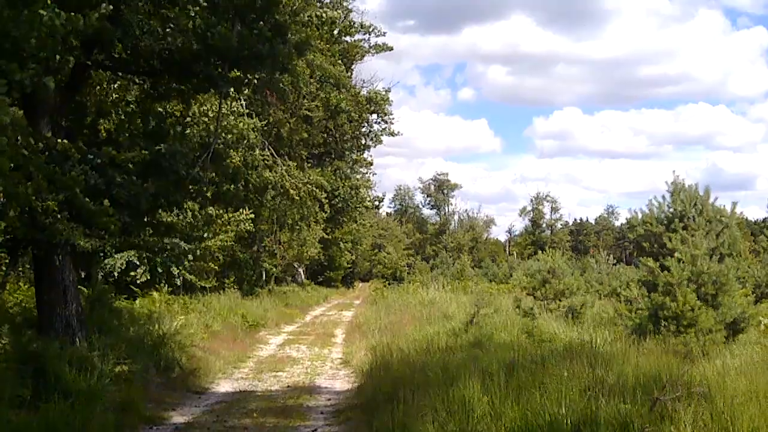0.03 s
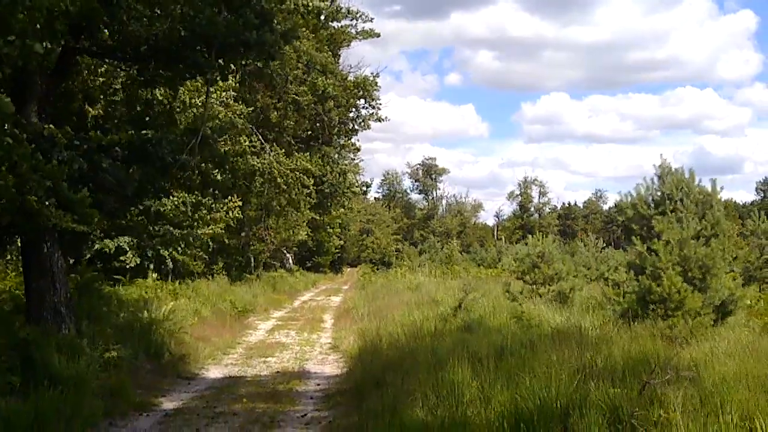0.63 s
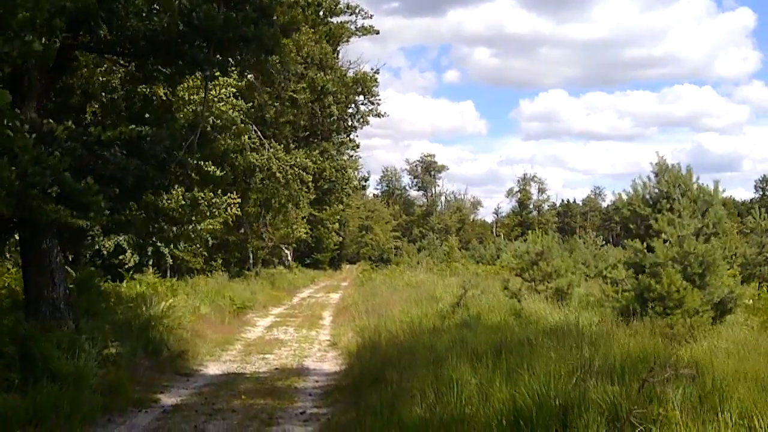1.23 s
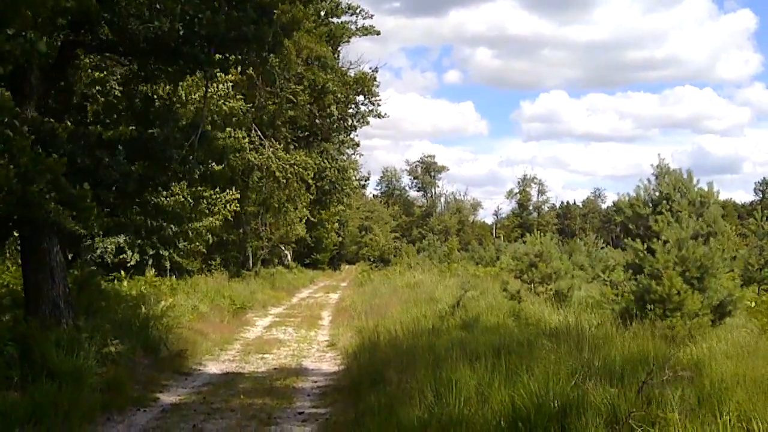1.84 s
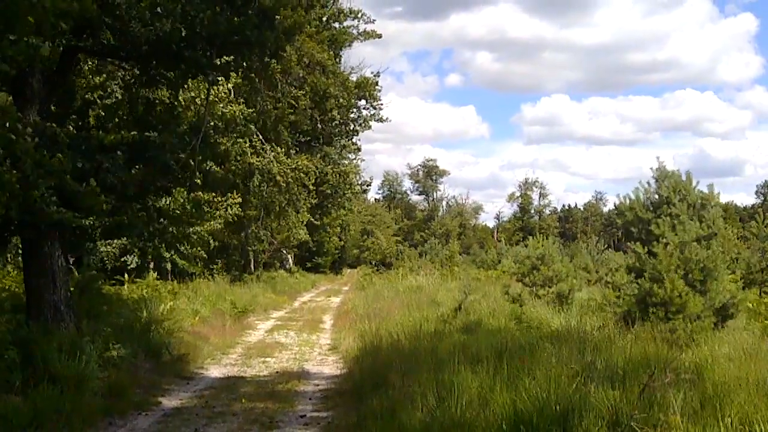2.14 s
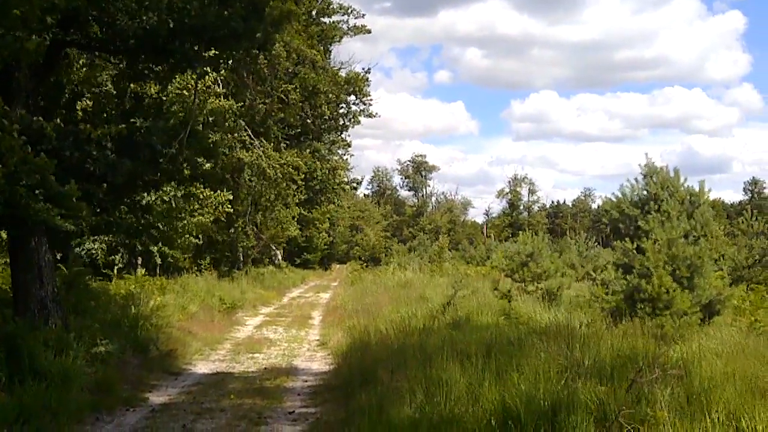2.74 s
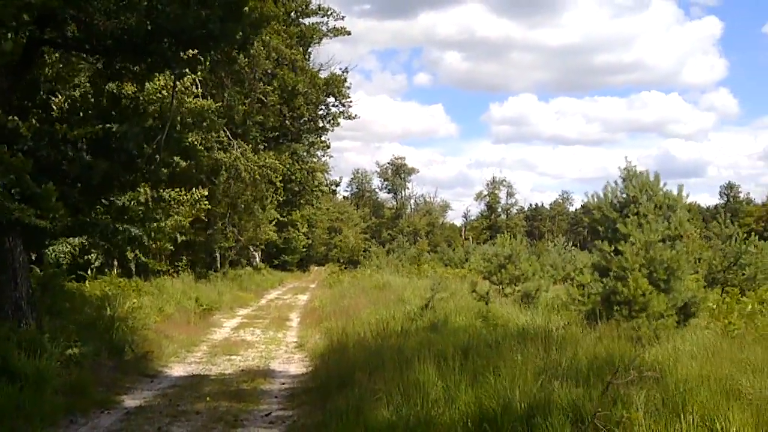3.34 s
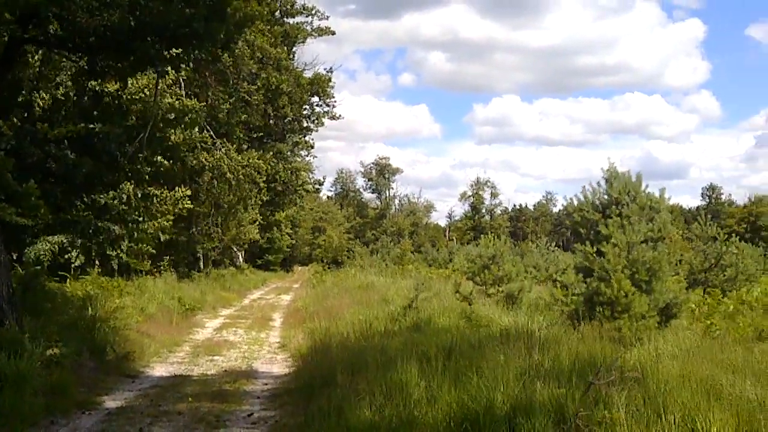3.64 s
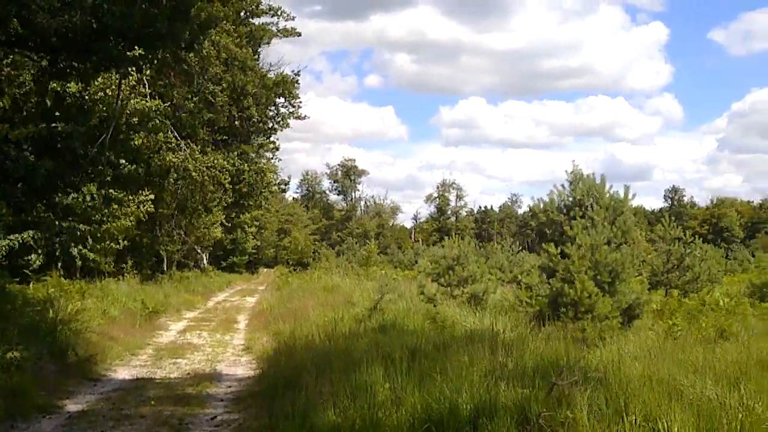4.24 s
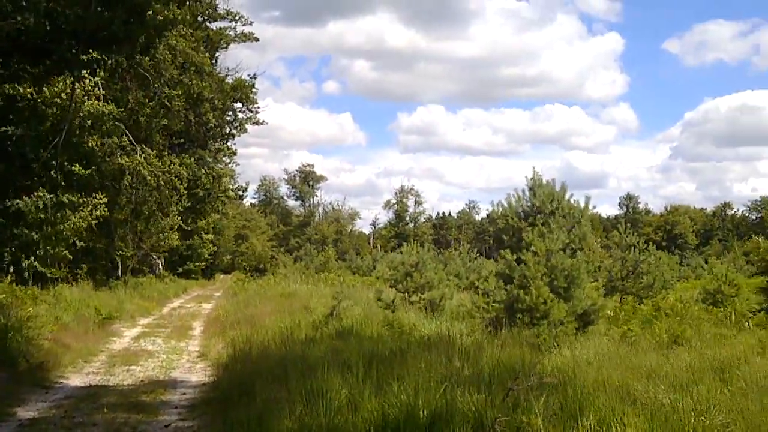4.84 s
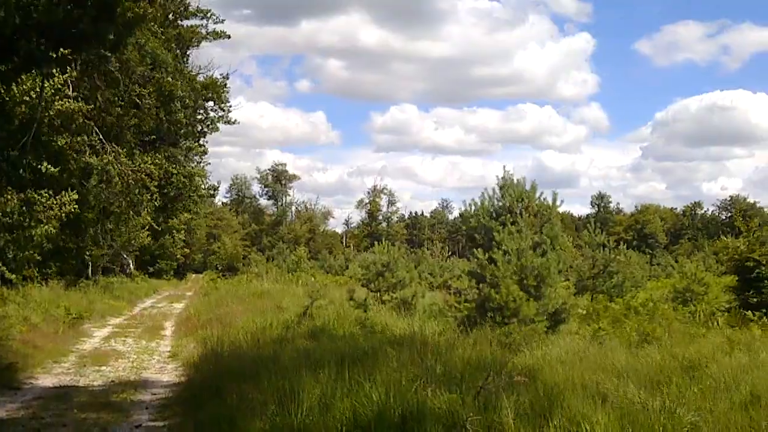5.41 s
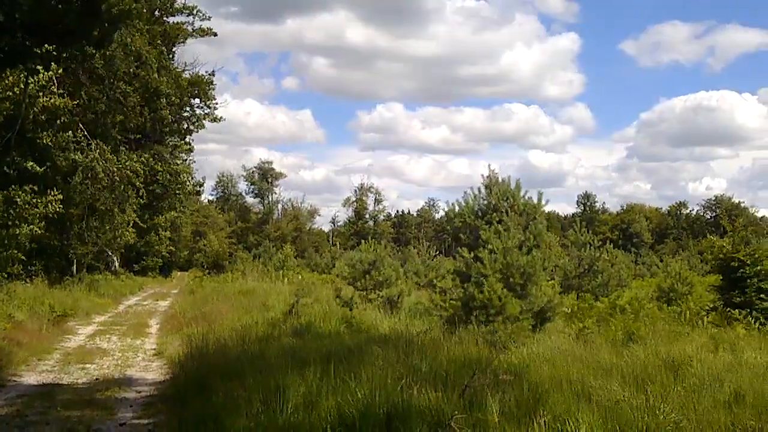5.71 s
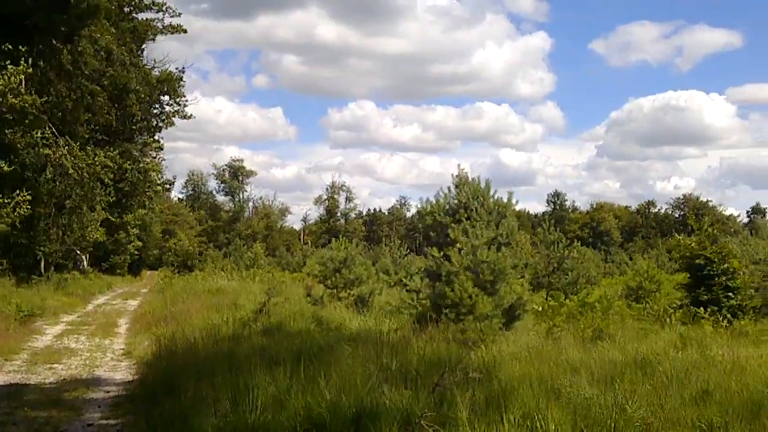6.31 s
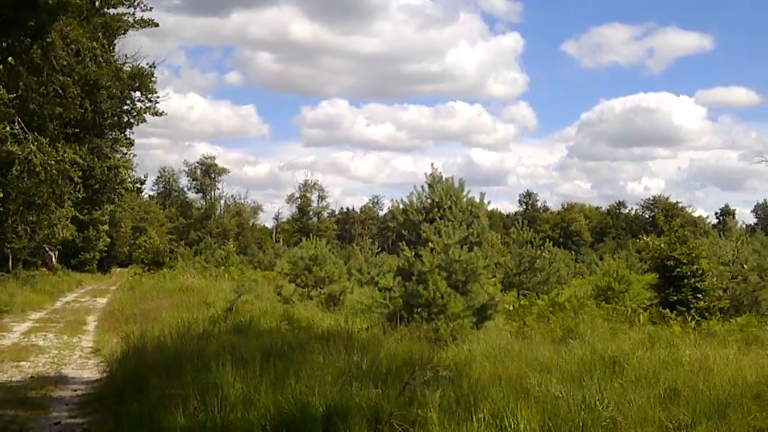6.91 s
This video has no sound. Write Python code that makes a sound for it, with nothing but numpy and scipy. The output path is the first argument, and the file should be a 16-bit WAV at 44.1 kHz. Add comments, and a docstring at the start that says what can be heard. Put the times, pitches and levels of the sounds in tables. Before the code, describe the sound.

Outdoors among trees, a continuous hiss of leaves and grass lies over the hollow rush of far treetops. Faint, short bird whistles come mostly in the first two seconds. Then wind buffets the microphone in irregular gusts, with rumble, flutter and low thumps louder than everything else, and the forest sound dips briefly at some of them. Toward the end, a barely audible hum rises far away under the wind.

```python
"""A forest track in the wind, heard from a camera's microphone. Close by, leaves and long grass hiss
as they brush together; far off, the treetops sough and a faint drone comes up late.
Eddies buffet the microphone with a rumble and a few hard thumps, and the forest dips briefly in level.
A twig ticks, small birds whistle faintly among the trees, and the camera adds a thin whine."""
import sys
import numpy as np
from scipy import signal
from scipy.fft import rfft, irfft, next_fast_len
from scipy.io import wavfile
from scipy.ndimage import uniform_filter1d, map_coordinates

SR = 44100
rng = np.random.default_rng(int(sys.argv[2]) if len(sys.argv) > 2 else 0)


def pcm_store(signal):
    """Save signal as 16-bit PCM."""
    levels = np.round(np.clip(np.atleast_2d(signal), -1, 1) * 32767)
    wavfile.write(sys.argv[1], SR, levels.astype(np.int16).T)


N = 311346
TIME = np.arange(N) / SR


def amp(db):
    """Decibels to gain."""
    return 10 ** (np.asarray(db) / 20)


def unit(x):
    """x at rms 1."""
    return x / np.sqrt(np.mean(x ** 2) + 1e-20)


def along(points, hz):
    """(Hz, value) points read on a log axis."""
    knots_hz, values = np.transpose(points)
    return np.interp(np.log(hz + 1), np.log(knots_hz + 1), values)


def curves(rows):
    """One value per sample for each column after the time."""
    times, *columns = np.transpose(rows)
    return [np.interp(TIME, times, column) for column in columns]


def wobble(rate):
    """A smooth random curve, rate knots a second."""
    knots = rng.standard_normal(int(N * rate / SR) + 4)
    return map_coordinates(knots, [TIME * rate])


def filtered(x, response):
    """x through a filter whose gain is response(Hz)."""
    size = next_fast_len(N + SR // 2)
    return irfft(rfft(x, size) * response(np.fft.rfftfreq(size, 1 / SR)), size)[:N]


def coloured(x, spectrum):
    """x shaped by (Hz, dB) points, at rms 1."""
    return unit(filtered(x, lambda hz: amp(along(spectrum, hz))))


def patchy_noise(patchy_db):
    """White noise whose level drifts in patches of time and pitch, as branches move in turn."""
    bands = signal.stft(rng.standard_normal(N), nperseg=512)[2]
    patches = uniform_filter1d(rng.standard_normal(bands.shape), size=7, axis=0)  # across pitch
    patches = uniform_filter1d(patches, size=16, axis=1)  # across time
    return unit(signal.istft(bands * amp(patchy_db * unit(patches)), nperseg=512)[1][:N])


def leaf_ticks(hiss_db, per_second, scatter_db):
    """Leaves and stalks touch at random, more often in stronger wind."""
    touches = rng.random(N) < per_second / SR * unit(amp(hiss_db))
    return unit(touches * rng.standard_normal(N) * amp(scatter_db * rng.standard_normal(N)))


# The wind easing along the track. Each row: time in seconds, near hiss in dB, far sough in dB.
WIND_LEVELS = [(0.1, -50, -52), (1.1, -50, -53), (1.8, -51.5, -52.5), (2.6, -55.5, -55), (3.7, -53.5, -54),
               (5.4, -54.5, -54), (7.06, -55, -54)]
# Leaves and grass close to the microphone. Each row: frequency in Hz, relative level in dB.
LEAF_SPECTRUM = [(300, -52), (900, -6), (1500, -2), (2100, -2), (3000, -1), (5000, 0), (6700, 2),
                 (7400, -2), (8400, -10), (9600, -15), (10600, -13), (12500, -22), (15200, -29)]

def foliage(fizz_db_per_s=0.4, fizz_even_s=4.2):
    """Countless leaves beside the track merge into a hiss; the nearest add a fine grain."""
    hiss_db, _ = curves(WIND_LEVELS)
    wash = patchy_noise(patchy_db=0.72)
    grain = amp(-10) * leaf_ticks(hiss_db, per_second=900, scatter_db=1.5)
    hiss = coloured(wash + grain, LEAF_SPECTRUM)
    fizz = filtered(hiss, lambda hz: along([(7000, 0.15), (11000, 0.84)], hz))
    fizz_gain = amp(fizz_db_per_s * (TIME - fizz_even_s))  # brighter as the camera turns to the grass
    return amp(hiss_db + 0.22 * wobble(22)) * (hiss + fizz * (fizz_gain - 1))


# Far treetops, heard from the track. Each row: frequency in Hz, relative level in dB.
SOUGH_SPECTRUM = [(60, -35), (200, -4), (360, -1.5), (450, -1.5), (530, 0), (700, 1), (900, -2.5),
                  (1200, -7.5), (1700, -13), (3000, -26.5)]

def treetops():
    """Air shed from distant twigs and needles makes a soft, hollow rush."""
    _, sough_db = curves(WIND_LEVELS)
    sway_db = 0.8 * wobble(8)
    return amp(sough_db + sway_db) * coloured(patchy_noise(patchy_db=0.72), SOUGH_SPECTRUM)


def eddies(spectrum, size):
    """Turbulent pressure whose strength holds even over stretches of size samples."""
    pressure = coloured(rng.standard_normal(N), spectrum)
    power = uniform_filter1d(uniform_filter1d(pressure ** 2, size), size)
    return unit(pressure / np.sqrt(np.abs(power) + 1e-6))


def gust(start, hold, attack_s=0.02, decay_s=0.048):
    """The strength of one gust: it rises, holds and dies away exponentially."""
    age = TIME - start
    return np.clip(age / attack_s, 0, 1) * np.exp(-np.maximum(age - attack_s - hold, 0) / decay_s)


# Large, then small eddies right on the microphone. Each row: frequency in Hz, relative level in dB.
RUMBLE_SPECTRUM = [(8, -14), (22, 3.5), (35, 1), (65, 0), (100, -5.5), (140, -15), (220, -31), (500, -70)]
FLUTTER_SPECTRUM = [(50, -22.5), (100, -2), (140, 1), (200, -7.5), (270, -14.5), (400, -25.5), (700, -40),
                    (1500, -75)]
# Light air over the microphone between gusts. Each row: time in seconds, relative rumble in dB.
BREEZE_LEVELS = [(0.1, -51), (0.45, -48), (1.1, -47), (2.2, -38.5), (3.6, -37.5), (4.15, -48), (5.25, -45),
                 (5.9, -42.5), (7.0, -40)]
# Gusts on the microphone. Each row: start and hold in seconds, relative rumble and flutter in dB.
MIC_GUSTS = [(.57, .04, -43, -60), (0.7, .08, -39, -54), (1.317, 0.042, -38.5, -57),
             (1.566, 0.052, -36, -53), (1.873, 0.13, -33.5, -37.5), (2.305, .1, -30, -35),
             (2.503, 0.032, -37.5, -39.5), (2.588, 0.057, -31.5, -36.5), (2.724, 0.21, -37, -36.5),
             (2.968, .06, -29, -33), (3.322, 0.1, -35.5, -40.5), (3.507, 0.094, -34, -37.5),
             (3.82, 0.055, -32.5, -42), (4.273, .04, -41.5, -52), (4.469, 0.014, -36.5, -48),
             (4.559, 0.032, -29.5, -38), (4.695, 0.064, -38, -40), (4.92, 0.012, -30.5, -40),
             (5.372, 0.23, -37, -46.5), (5.635, 0.16, -32, -41), (5.84, 0.046, -35, -43.5),
             (6.635, 0.038, -37, -42.5), (6.816, 0.037, -34, -45), (6.948, 0.021, -31, -41)]

def buffeting(breeze_flutter_db=-12.0):
    """Large eddies rumble on the microphone; smaller ones flutter above them, most of all in gusts."""
    breeze_db, = curves(BREEZE_LEVELS)
    rumble_power = amp(breeze_db) ** 2
    flutter_power = amp(breeze_db + breeze_flutter_db) ** 2
    for start, hold, rumble_db, flutter_db in MIC_GUSTS:
        shape = gust(start, hold)
        rumble_power += (amp(rumble_db) * shape) ** 2
        flutter_power += (amp(flutter_db) * shape) ** 2
    rumble = np.sqrt(rumble_power) * amp(-0.5 + 2.9 * wobble(18)) * eddies(RUMBLE_SPECTRUM, size=3000)
    flutter = np.sqrt(flutter_power) * amp(-0.15 + 2.4 * wobble(45)) * eddies(FLUTTER_SPECTRUM, size=1600)
    return rumble + flutter


def camera_whine(hz=11988, db=-79.5):
    """The camera gives off a very faint, slightly unsteady high tone."""
    level = amp(db + 2.2 * wobble(14))
    pitch = hz + 2 * wobble(12)
    return level * np.sin(2 * np.pi * np.cumsum(pitch) / SR)


# Sudden brief drops in the background's level, at the start and at some of the gusts.
# Each row: start in seconds, depth in dB.
LEVEL_DIPS = [(.03, 16), (1.64, 2.5), (1.94, 1.5), (2.02, 4), (2.39, 1.5), (2.45, 7), (3.06, 4),
              (3.885, 3.5), (6.97, 5)]

def dips(drop_s=0.019, recover_db_per_s=16.5):
    """Gain that drops at each dip and climbs back at a steady rate."""
    cut_db = np.zeros(N)
    for start, depth_db in LEVEL_DIPS:
        fall_db = depth_db * np.clip((TIME - start) / drop_s, 0, 1)
        recovery_db = recover_db_per_s * np.maximum(TIME - start - drop_s, 0)
        cut_db = np.maximum(cut_db, fall_db - recovery_db)
    return amp(-cut_db)


def twig(at_s=0.571, half_width_s=0.009, db=-48.0):
    """A dry twig ticks once: a short burst of bright noise."""
    burst = np.exp(-((TIME - at_s) / half_width_s) ** 2)
    spectrum = [(1500, -25), (3200, 2), (6000, -1), (10000, -20)]
    return amp(db) * burst * coloured(rng.standard_normal(N), spectrum)


# Small birds off among the trees.
# Each row: start and length in seconds, first and last pitch in Hz, relative level in dB.
BIRD_NOTES = [(.87, 0.045, 4300, 4180, -55), (.91, 0.041, 3380, 3540, -52), (1.09, .08, 8100, 8150, -59),
              (1.261, .08, 6780, 6560, -53), (1.265, .092, 8220, 8390, -53.5),
              (1.275, 0.0535, 3400, 2900, -52), (1.365, .026, 2870, 2700, -58),
              (1.489, 0.051, 2574, 2940, -50.5), (1.675, 0.031, 4400, 3550, -47.5),
              (1.737, 0.036, 2840, 2620, -54), (1.868, .07, 3510, 3335, -53.5),
              (1.908, 0.049, 3270, 3216, -49.5), (1.962, 0.062, 3215, 3254, -49.5),
              (2.12, .08, 3600, 3618, -49), (4.955, .03, 8250, 8150, -60), (6.4, .03, 8700, 8200, -60)]

def birds(waver=0.0093, settle_power=1.385, warble_db=2.5):
    """Each note is a wavering whistle that glides and settles on its end pitch, heard through the trees."""
    song = np.zeros(N)
    unsteady = 1 + waver * wobble(260)
    for start, length, start_hz, end_hz, db in BIRD_NOTES:
        on = (TIME >= start) & (TIME < start + length)
        progress = (TIME[on] - start) / length
        glide_hz = end_hz + (start_hz - end_hz) * np.abs(1 - progress) ** settle_power
        swell = np.sqrt(np.abs(np.sin(np.pi * progress)))
        song[on] += amp(db) * swell * np.sin(2 * np.pi * np.cumsum(glide_hz * unsteady[on]) / SR)
    direct = amp(-1 + warble_db * wobble(90)) * song
    return direct + amp(-4.5) * forest_echo(song)


# The echo among the trunks around the track. Each row: frequency in Hz, seconds to fall by 60 dB.
ECHO_DECAY = [(2000, 0.92), (3500, 0.89), (8000, 0.5)]

def forest_echo(x):
    """Trunks scatter a sound into a diffuse tail that loses its treble first."""
    hz, age, bands = signal.stft(rng.standard_normal(SR), SR, nperseg=256)
    decay = amp(-60 * age / along(ECHO_DECAY, hz)[:, None])
    tail = signal.istft(bands * decay, SR, nperseg=256)[1]
    return signal.fftconvolve(x, tail / np.linalg.norm(tail))[:N]


# Single eddies hitting the microphone. Each row: time in seconds, relative level in dB, centre in Hz.
EDDY_HITS = [(1.646, -26.5, 80), (1.963, -16.5, 120), (1.976, -20.5, 166), (2.392, -18, 112),
             (2.422, -23.5, 262), (2.531, -19, 157), (2.616, -22, 209), (3.01, -15, 151), (3.057, -23, 120),
             (3.547, -19.5, 190), (4.729, -20.5, 109), (4.78, -26, 245), (4.965, -26.5, 146),
             (5.739, -19.5, 162), (6.971, -20.5, 83.5)]

def thumps(trim_db=-1.5):
    """A vortex core passes the microphone's port: a brief suction between two soft pushes."""
    pressure = np.zeros(N)
    for at_s, db, hz in EDDY_HITS:
        offset_squared = (np.pi * hz * (TIME - at_s)) ** 2
        pulse = (2 * offset_squared - 1) * np.exp(-np.minimum(offset_squared, 50))
        pressure += amp(db + trim_db) * pulse
    return pressure


# A faint drone a long way off, coming up under the wind. Each row: time in seconds, level in dB.
DRONE_LEVELS = [(3.8, -79), (4.4, -68.5), (5.5, -60.5), (7.06, -65.5)]

def far_drone(hz=452, half_width_hz=16):
    """A narrow band of noise, heard as a wavering hum in the distance."""
    level_db, = curves(DRONE_LEVELS)
    band = filtered(rng.standard_normal(N), lambda f: 1 / (1 + ((f - hz) / half_width_hz) ** 2))
    return amp(level_db) * unit(band)


def scene():
    """One microphone on the track; all but the buffeting and the thumps dips together."""
    background = foliage() + treetops() + twig() + far_drone() + birds() + camera_whine()
    return (dips() * background + buffeting() + thumps())[None]


def record(dry, start_s=0.064, fade_s=0.0093, notch_hz=7900, half_width_hz=370, top_hz=15250):
    """The camera starts after a moment, has a deep notch in its treble and a band limit."""
    def response(hz):
        notch = (hz - notch_hz) ** 2 / ((hz - notch_hz) ** 2 + half_width_hz ** 2)
        return notch * (hz < top_hz)

    fade_in = np.clip((TIME - start_s) / fade_s, 0, 1)
    return filtered(dry[0] * fade_in, response)[None]


dry = scene()
out = record(dry)
pcm_store(out)
```